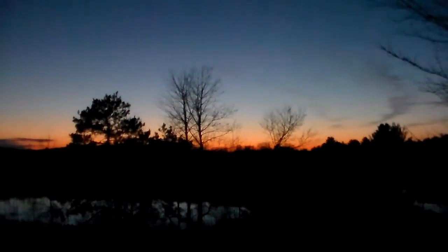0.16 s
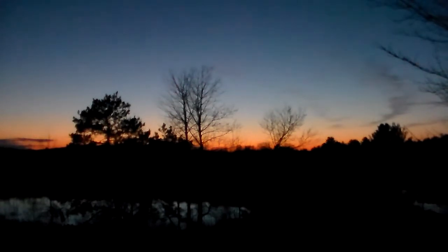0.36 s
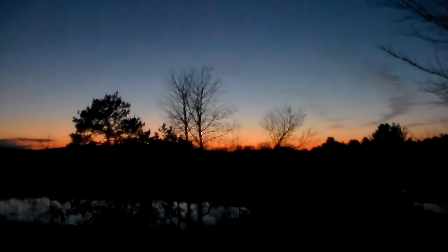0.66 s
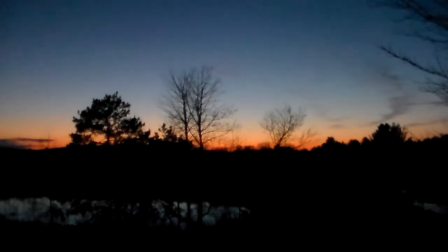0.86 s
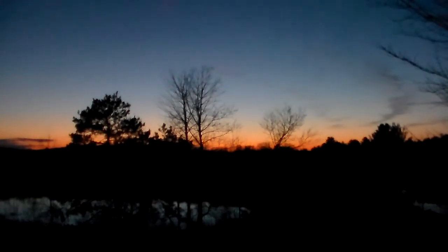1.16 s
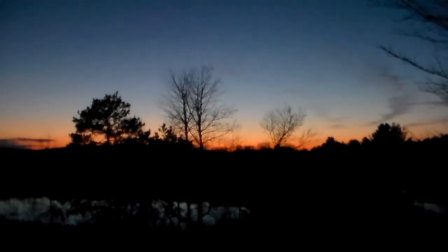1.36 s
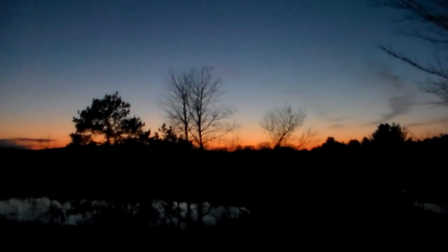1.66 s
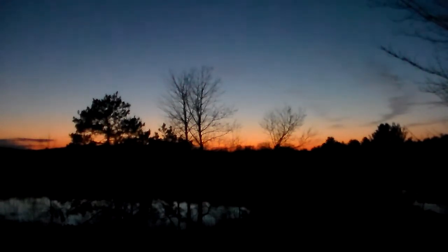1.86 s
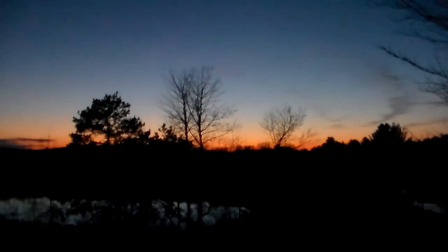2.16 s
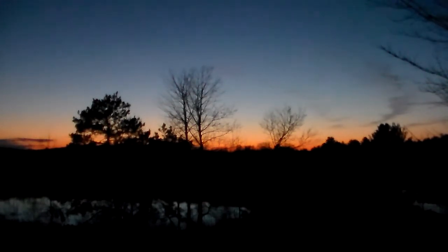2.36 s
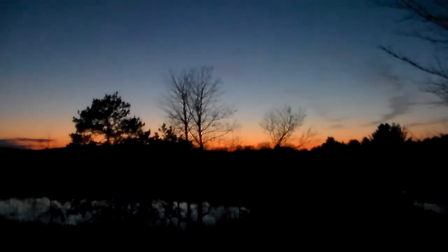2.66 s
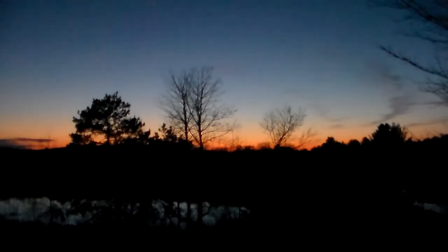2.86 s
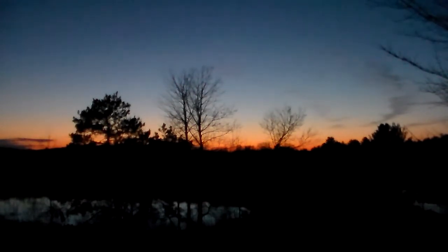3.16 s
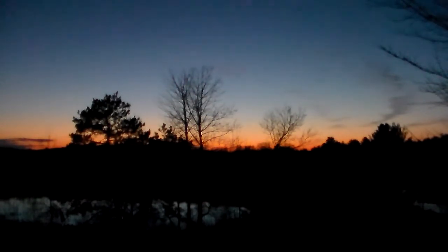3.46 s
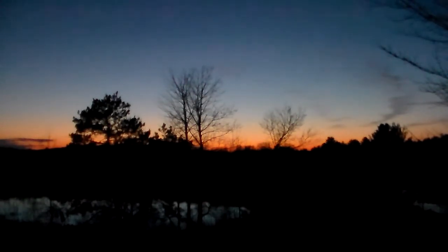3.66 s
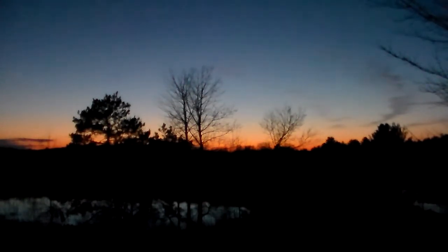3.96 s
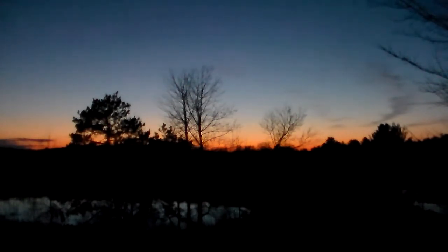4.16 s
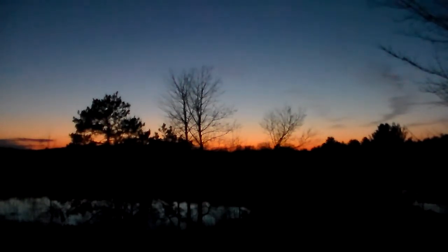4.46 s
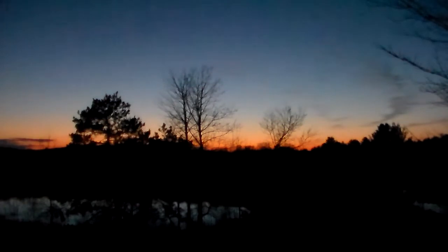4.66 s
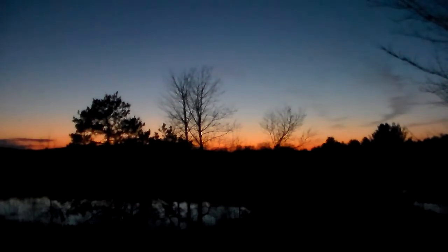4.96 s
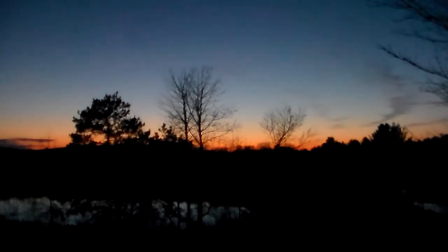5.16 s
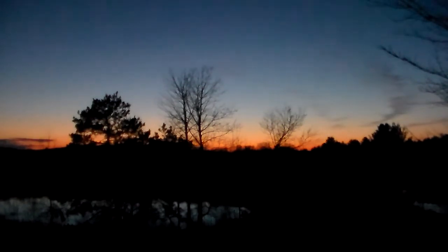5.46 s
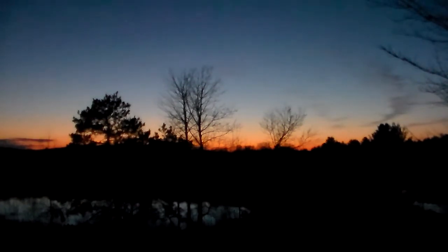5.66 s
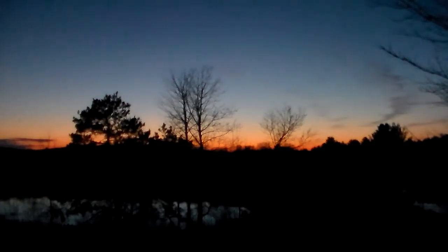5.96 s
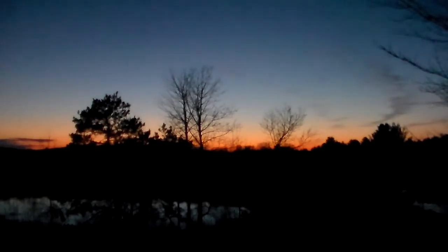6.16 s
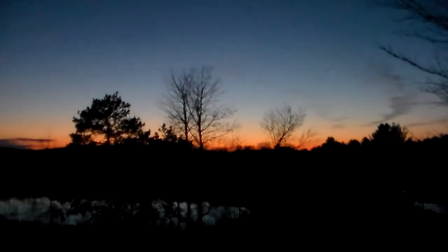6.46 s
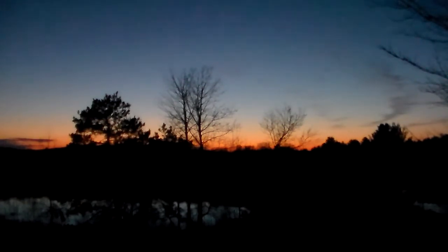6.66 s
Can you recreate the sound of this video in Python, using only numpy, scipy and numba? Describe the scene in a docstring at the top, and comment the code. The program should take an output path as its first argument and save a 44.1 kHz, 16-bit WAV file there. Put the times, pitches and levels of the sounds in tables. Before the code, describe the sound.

For about 6.8 seconds, an open wetland at dusk rings with a steady, dense chorus of small frogs. Hundreds of overlapping peeps, each a nearly pure whistle around 2.3 to 3.2 kHz sliding upward for roughly a tenth of a second or slightly longer, merge into a shimmering wall. Nearer peeps stand out irregularly throughout, often in loose clusters. A brighter rising whistle near 3.4 kHz recurs around 0.7, 2.1, 3.5, 5.0 and 6.1 s. Barely audible are soft lower whistles, tiny bird chips and fast nasal buzzes at 0.1, 2.9 and 5.6 s. Beneath lies faint low traffic haze; one distant vehicle fades over the first second or two. Soft scattered echoes blur the animals. The wide stereo pickup adds gentle hiss and negligible hum. The chorus continues unresolved to the end.

```python
"""Frogs at dusk

A wetland crowded with small frogs; each peep is a short rising whistle with weak overtones.
Gliding tones make a few whistles and bird chips, and a snipe-like bird buzzes three times in fast pulses.
Far traffic is a bass haze of shaped noise, with one vehicle fading away. Soft echoes blur the animals.
A small stereo camera hears it all and adds its own hiss, hum and whine."""
import sys
import numpy as np
from scipy import signal
from scipy.fft import rfft, irfft, next_fast_len
from scipy.io import wavfile
from scipy.ndimage import uniform_filter1d
from numba import njit

SR = 44100
rng = np.random.default_rng(int(sys.argv[2]) if len(sys.argv) > 2 else 0)


def wav_record(signal):
    """Record a signal, one row per channel, as 16-bit PCM in the file named by sys.argv[1]."""
    frames = np.transpose(np.atleast_2d(signal))
    bounded = np.clip(frames, -1, 1)
    # unit amplitude maps onto the largest positive 16-bit level
    quanta = np.round(bounded * 32767).astype(np.int16)
    wavfile.write(sys.argv[1], SR, quanta)


N = 300321  # length of the scene in samples

# Levels of animal calls are those before any overtone gain, frog colour or echo.
# Peeps that stand out from the crowd, by loudness or by very low or high pitch.
# Each row: start in seconds, length in seconds, starting pitch in Hz, level in dB.
STANDOUT_PEEPS = [(0.005, 0.07, 2340, -41.5), (0.039, 0.17, 2956, -36.5), (0.088, 0.1, 2650, -37),
                  (0.21, 0.16, 2626, -31.5), (0.229, 0.064, 2710, -36), (0.239, 0.13, 2890, -34),
                  (0.24, 0.07, 2370, -40), (0.31, 0.085, 3090, -37.5), (0.342, 0.059, 2870, -37),
                  (0.386, 0.04, 3280, -50), (0.763, 0.1, 2835, -37), (0.818, 0.07, 3170, -46),
                  (0.925, 0.11, 2394, -34.5), (0.932, 0.22, 2590, -44), (0.968, 0.12, 2270, -40),
                  (1.169, 0.061, 2684, -30.5), (1.2, 0.1, 2904, -33), (1.26, 0.089, 2324, -40),
                  (1.322, 0.13, 2446, -37), (1.399, 0.094, 2860, -35), (1.431, 0.094, 3055, -34),
                  (1.466, 0.15, 2440, -35), (1.511, 0.062, 2650, -34.0), (1.54, 0.1, 2426, -38),
                  (1.577, 0.06, 3310, -48), (1.818, 0.086, 2865, -30.5), (1.911, 0.086, 2900, -40),
                  (2.023, 0.088, 2660, -34.5), (2.052, 0.058, 2894, -34), (2.192, 0.18, 2360, -34.5),
                  (2.22, 0.059, 2620, -33.0), (2.277, 0.18, 2937, -35.8), (2.31, 0.07, 2320, -39.5),
                  (2.425, 0.078, 2510, -34), (2.429, 0.11, 2870, -37.5), (2.474, 0.057, 2660, -35),
                  (2.668, 0.099, 2294, -39.5), (2.695, 0.15, 2446, -33), (2.716, 0.09, 3057, -34.2),
                  (2.87, 0.13, 2320, -41.5), (3.04, 0.06, 3240, -50), (3.164, 0.1, 2800, -30.5),
                  (3.39, 0.097, 2620, -30), (3.408, 0.098, 2540, -34), (3.427, 0.091, 2830, -35),
                  (3.546, 0.24, 2366, -39), (3.556, 0.1, 2443, -37), (3.656, 0.094, 3045, -33.5),
                  (3.869, 0.097, 2456, -33.5), (3.87, 0.093, 3080, -41), (3.998, 0.13, 2847, -36),
                  (4.003, 0.12, 2264, -42.5), (4.056, 0.13, 2430, -35.5), (4.086, 0.062, 2576, -31.5),
                  (4.131, 0.065, 3096, -32.5), (4.28, 0.094, 2310, -42), (4.311, 0.1, 2585, -32),
                  (4.361, 0.059, 2940, -33), (4.408, 0.07, 2824, -32.5), (4.435, 0.05, 2370, -37),
                  (4.486, 0.19, 2534, -35.0), (4.49, 0.074, 2770, -39), (4.516, 0.13, 2460, -37),
                  (4.664, 0.067, 2910, -32), (4.737, 0.063, 2850, -32), (4.742, 0.079, 2370, -38.5),
                  (4.744, 0.082, 2720, -35), (4.813, 0.086, 2475, -30), (4.901, 0.07, 2530, -32),
                  (5.041, 0.07, 2620, -38), (5.078, 0.074, 3150, -37), (5.096, 0.07, 2995, -34),
                  (5.154, 0.13, 2740, -39), (5.369, 0.081, 3080, -35.2), (5.448, 0.085, 2640, -33.5),
                  (5.478, 0.098, 2290, -38), (5.546, 0.056, 2570, -38), (5.616, 0.048, 2890, -30),
                  (5.616, 0.094, 2490, -37), (5.765, 0.18, 2364, -35.8), (5.778, 0.11, 2980, -36),
                  (5.78, 0.088, 3016, -33), (5.797, 0.063, 2820, -38), (5.951, 0.06, 2350, -39),
                  (5.995, 0.075, 3000, -37.5), (6.184, 0.092, 2450, -35.5), (6.25, 0.11, 3140, -50),
                  (6.311, 0.053, 2520, -31.5), (6.452, 0.26, 2470, -38), (6.578, 0.17, 2955, -36.5),
                  (6.721, 0.09, 2930, -34.5)]
# Loudness of all the farther frogs together. Each row: time in seconds, level in dB.
CROWD_LEVEL = [(0, -27.5), (.36, -29.5), (.45, -30.5), (.9, -29), (1.7, -29.5), (2.1, -28.5), (2.6, -29.5),
               (3.1, -30.5), (3.45, -29.5), (3.8, -30), (4.27, -31), (4.7, -28.5), (5.4, -29), (6.1, -29.5),
               (6.81, -29.5)]
# Tones within a far peep. Each row: multiple of the main pitch, level in dB.
FAR_OVERTONES = [(.5, -47), (1, 4.5), (1.5, -24.5), (2, -45.5)]
# Tones within a standout peep. Each row: multiple of the main pitch, level in dB.
STANDOUT_OVERTONES = [(.5, -44), (1, 3.5), (1.5, -32), (2, -45.5)]
# Colour given to the frogs' peeps in the treble. Each row: frequency in Hz, boost in dB.
FROG_COLOUR = [(3450, 0), (3620, 7.5), (3850, 2.5), (4450, 1.5), (4850, -8), (5400, 8.5), (5850, 7.5),
               (6200, -16)]
# Slurred whistles of birds and of one high caller, probably a frog.
# One row per caller: (length in seconds, start, middle and end pitch in Hz,
# level change by the end in dB), then its calls, each with start in seconds and level in dB.
WHISTLE_CALLERS = [((.115, 3210, 3445, 3505, -19), [(.733, -29.5), (2.107, -29), (3.47, -30), (4.975, -29),
                   (6.122, -29.5)]), ((.33, 2230, 2300, 2440, 5), [(1.59, -47.5), (3.872, -49),
                   (6.131, -50)]), ((.27, 1970, 1920, 2000, 0), [(.128, -56.5), (2.684, -55.5),
                   (4.75, -53.5)]), ((.12, 2390, 2240, 2370, -2), [(.74, -51), (3.35, -51), (4.72, -53)]),
                   ((.09, 1140, 1163, 1180, -6), [(5.32, -42)]), ((.07, 3880, 3720, 3620, -3),
                   [(3.405, -51)])]
# Short bird chips, one row per caller: (length in seconds, middle pitch in Hz),
# then its calls, each with start in seconds and level in dB.
CHIP_CALLERS = [((0.045, 4190), [(.002, -47.5), (.81, -53), (1.31, -52), (3.375, -50.5), (4.735, -49),
                (5.53, -49), (6.28, -47)]), ((0.011, 3650), [(.853, -44), (1.29, -46), (2.361, -47),
                (4.196, -44.5), (5.568, -43.5)])]
# Buzz calls. Each row: start in seconds, level in dB.
BUZZ_CALLS = [(.13, -57.5), (2.87, -57), (5.575, -55.5)]
# Colour of the buzz. Each row: frequency in Hz, relative strength in dB.
BEAK_COLOUR = [(3500, -10), (4450, 0), (5200, -4), (5400, 4), (5800, -4), (6300, -18)]
# Noise colour of far traffic, relative within a band. Each row: frequency in Hz, strength in dB per Hz.
HAZE_COLOUR = [(15, -29), (25, -28), (54, -9), (125, -7), (244, -5), (289, 1.5), (361, -10), (396, -4.5),
               (574, -9), (703, -7.5), (772, -10.5), (847, -6), (1620, -16), (2100, -22.5), (2730, -9.5),
               (4620, -120)]
# Noise colour of the vehicle, relative within a band. Each row: frequency in Hz, strength in dB per Hz.
VEHICLE_COLOUR = [(20, -8), (100, -2), (220, 3), (500, -3), (1000, -5.5), (2000, -20), (4600, -120)]
# Traffic in four bands: hum, rumble, drone, tyre rush. Each row: haze level at the start in dB,
# its swell in dB per second, vehicle level at the start in dB, its fade in dB per second.
TRAFFIC_BANDS = [(-57.5, 0, -62, 0), (-55, 0, -44.5, 5), (-48, 0.29, -38.5, 12), (-46, 0.43, -44, 4.5)]
# Narrow whirs in the haze. Each row: centre in Hz, width in Hz, level at the end in dB.
TRAFFIC_WHIRS = [(860, 55, -57), (1620, 30, -60)]
# How alike left and right traffic noise are. Each row: frequency in Hz, likeness (1 is identical).
LIKENESS = [(30, 0.69), (250, 0.99), (1000, 0.91), (2000, 0.84)]
# Relative colour of microphone noise. Each row: frequency in Hz, strength in dB per Hz.
HISS_COLOUR = [(1500, 3.5), (4000, 7), (7000, -0.5), (11000, -2), (14000, -3.5)]
# Whine of the camera electronics. Each row: frequency in Hz, level in dB.
WHINE_TONES = [(7853, -82), (7882, -82)]

CALL_EDGE = .22  # share of a call spent swelling in, and again dying out
STANDOUT_CLIMB_HZ_PER_S = 1650  # how fast the standout peeps rise
BUZZ_S, BUZZ_HZ = .195, 193  # length in seconds, highest pulse rate in pulses per second
WHIR_SWELL_DB_PER_S = 5
TOP_HZ = 14100  # the camera keeps nothing above this


def amp(db):
    """Turn decibels into a plain multiplier."""
    return 10 ** (np.asarray(db) / 20)


def unit(x):
    """Scale a sound to an average (RMS) strength of one."""
    return x / np.sqrt(np.mean(x ** 2) + 1e-20)


def along(points, hz):
    """Read a curve of (Hz, value) points on a log frequency axis."""
    f, value = np.transpose(points)
    return np.interp(np.log(hz + 1), np.log(f + 1), value)


def filtered(x, response):
    """Reshape a sound by multiplying its spectrum by a response to frequency."""
    m = next_fast_len(N + SR // 2)
    return irfft(rfft(x, m) * response(np.fft.rfftfreq(m, 1 / SR)), m)[..., :N]


def spread(table):
    """List all calls as columns: each call's own values, then its caller's shape."""
    return np.transpose([(*call, *shape) for shape, calls in table for call in calls])


@njit
def glides(rows, partials, edge, sr, n):
    """Tones bending smoothly through three pitches, with partials at multiples of half the pitch."""
    out = np.zeros((2, n))
    for s, length, a, b, c, fade, left, right, phase in rows:
        first, steps = int(s.real * sr), int(length.real * sr)
        angle = phase.real
        for i in range(steps):
            u = i / steps
            pitch = (a + u * (4 * b - 3 * a - c) + 2 * u * u * (a + c - 2 * b)).real
            angle += np.pi * pitch / sr
            if 0 <= first + i < n:
                half = np.cos(angle) + 1j * np.sin(angle)  # half the main pitch
                ramp = min(1., u / edge, (1 - u) / edge)
                wave, power = 0j, half
                for gain in partials:
                    wave += gain * power
                    power *= half  # the next multiple
                wave *= ramp * ramp * (3 - 2 * ramp)
                wave *= 1 + (fade.real - 1) * u * (2 - u)
                out[0, first + i] += (left * wave).imag
                out[1, first + i] += (right * wave).imag
    return out


def callers(s, length, start_hz, middle_hz, end_hz, db, fade_db, overtones, pan_db, turn):
    """Each call gets its own direction: level (dB) and phase (radians) differ between the ears."""
    side = rng.standard_normal((len(s), 3))
    lean = amp(pan_db * side[:, 0]) * np.exp(1j * turn * side[:, 1])
    fade = amp(fade_db) * np.ones(len(s))
    phase = np.pi * side[:, 2]
    rows = [s, length, start_hz, middle_hz, end_hz, fade, amp(db) * lean, amp(db) / lean, phase]
    return glides(np.transpose(rows).copy(), amp(np.transpose(overtones)[1]), CALL_EDGE, SR, N)


def stereo_noise(gain):
    """Noise made of a shared part and an opposed part, mixed to the wanted left-right likeness."""
    def shape(hz):
        turn = np.arccos(np.clip(along(LIKENESS, hz), -1, 1)) / 2
        return gain(hz) * [np.cos(turn), np.sin(turn)]

    mid, side = filtered(rng.standard_normal((2, N)), shape)
    return unit(np.array([mid + side, mid - side]))


def traffic():
    """Bands of noise: a vehicle fades from the start while a haze and narrow whirs remain and swell."""
    edges = [1, 70, 240, 700, 20000]  # Hz
    t = np.arange(N) / SR

    def below(hz, edge_hz):
        """Share of power passed below a soft edge."""
        return 1 / (1 + (hz / edge_hz) ** 6)

    out = np.zeros((2, N))
    for (steady_db, swell, vehicle_db, fade), low, high in zip(TRAFFIC_BANDS, edges, edges[1:]):
        band = lambda hz: np.sqrt(np.abs(below(hz, high) - below(hz, low)))
        haze = stereo_noise(lambda hz: amp(along(HAZE_COLOUR, hz)) * band(hz))
        vehicle = stereo_noise(lambda hz: amp(along(VEHICLE_COLOUR, hz)) * band(hz))
        out += amp(steady_db + swell * t) * haze
        out += amp(vehicle_db - fade * t) * vehicle
    for centre_hz, width, db in TRAFFIC_WHIRS:
        whir = stereo_noise(lambda hz: np.exp(-((hz - centre_hz) / width) ** 2))
        out += amp(db + WHIR_SWELL_DB_PER_S * (t - t[-1])) * whir
    return out * amp([[-.4], [.4]])  # slightly louder on the right


def buzzes():
    """A nasal buzz: fast pulses, made of tones one pulse rate apart; the pitch arches slightly."""
    out = np.zeros(N)
    for s, db in BUZZ_CALLS:
        u = np.arange(int(BUZZ_S * SR)) / (BUZZ_S * SR)
        phase = 2 * np.pi * np.cumsum(BUZZ_HZ * (1 - .04 * (u - .5) ** 2)) / SR
        lines = sum(amp(along(BEAK_COLOUR, k * BUZZ_HZ)) * np.sin(k * phase) for k in np.arange(18, 34))
        swell = np.sin(np.pi * u) ** .7
        rasp = 1 + .2 * rng.standard_normal(len(u) // 40 + 1).repeat(40)[:len(u)]  # rough, uneven level
        out[round(s * SR):][:len(u)] += amp(db) * swell * rasp * unit(lines)
    return out


def whistles_and_chips():
    """Pure gliding tones: slurred whistles and short, slightly rising chips."""
    pure = [(.5, -120), (1, 0)]  # practically only the main pitch
    s, db, length, hz = spread(CHIP_CALLERS)
    chips = callers(s, length, .98 * hz, hz, 1.012 * hz, db, 2, pure, pan_db=3.5, turn=0.2)
    s, db, length, start, middle, end, fade_db = spread(WHISTLE_CALLERS)
    whistles = callers(s, length, start, middle, end, db, fade_db, pure, pan_db=1, turn=0.093)
    return chips + whistles


def far_frogs(count=2200):
    """Rising peeps at random moments, each with its own pitch and climb, blend into a crowd."""
    when, pitch, size, climb, span, far = rng.random((count, 6)).T
    length = 0.0868 + 0.12 * span
    start = 2320 + 520 * pitch + 130 * size
    db = -8 * far
    faint = np.arange(count) % 4 == 0  # every fourth call is faint and may lie above or below the crowd
    start[faint] = 2190 + 960 * pitch[faint]
    db[faint] = -27
    end = start + length * (1200 + 1100 * climb)
    end[~faint] = np.minimum(end[~faint], 3190)  # most far peeps end by 3190 Hz
    middle = start + .55 * (end - start)
    s = when * (N / SR + .2) - .2  # some are already sounding at the start
    calls = callers(s, length, start, middle, end, db, 0, FAR_OVERTONES, pan_db=-1.0, turn=0.32)
    # divide by the loudness over a fifth of a second, so the level curve sets the crowd
    loudness = np.sqrt(np.abs(uniform_filter1d(np.mean(calls ** 2, axis=0), size=SR // 5)))
    seconds, level_db = np.transpose(CROWD_LEVEL)
    return amp(np.interp(np.arange(N) / SR, seconds, level_db)) * calls / loudness


def standout_frogs():
    """Peeps that stand out from the crowd: nearly pure tones that rise in a straight line."""
    s, length, start, db = np.transpose(STANDOUT_PEEPS)
    end = start + STANDOUT_CLIMB_HZ_PER_S * length
    middle = (start + end) / 2
    return callers(s, length, start, middle, end, db, 0, STANDOUT_OVERTONES, pan_db=-0.7, turn=0.15)


def marsh(x, t60, gap_s):
    """Scattered echoes from reeds and the tree line: fading noise, different at each ear."""
    t = np.arange(SR // 2) / SR
    tail = rng.standard_normal((2, len(t))) * amp(-60 * t / t60) * (t > gap_s)
    return signal.fftconvolve(x, tail / np.linalg.norm(tail[0]), axes=1)[:, :N]


def scene():
    """Frogs with their treble colour, other callers, the echoes of both, and dry traffic."""
    frogs = filtered(standout_frogs() + far_frogs(), lambda hz: amp(along(FROG_COLOUR, hz)))
    other_callers = whistles_and_chips() + buzzes()
    echo = marsh(amp(-7) * frogs + amp(-13) * other_callers, t60=.6, gap_s=.004)
    return frogs + other_callers + echo + traffic()


def record(dry):
    """The camera adds noisy hiss, steady hum and whine tones, and cuts everything above its limit."""
    hiss = filtered(rng.standard_normal((2, N)), lambda hz: amp(along(HISS_COLOUR, hz)) * (hz < TOP_HZ))
    hiss = amp(-55.0) * unit(hiss)
    t = np.arange(N) / SR
    hum_and_whine = [(30, -55), *WHINE_TONES]  # Hz, dB
    tones = sum(amp(db) * np.sqrt(2) * np.sin(2 * np.pi * hz * t) for hz, db in hum_and_whine)
    return filtered(dry + hiss + tones, lambda hz: hz < TOP_HZ)


dry = scene()
out = record(dry)
wav_record(out)
```